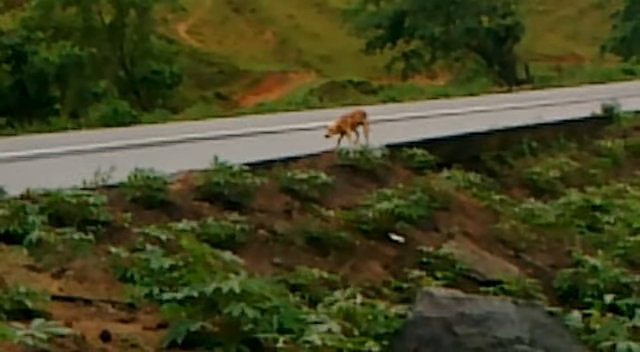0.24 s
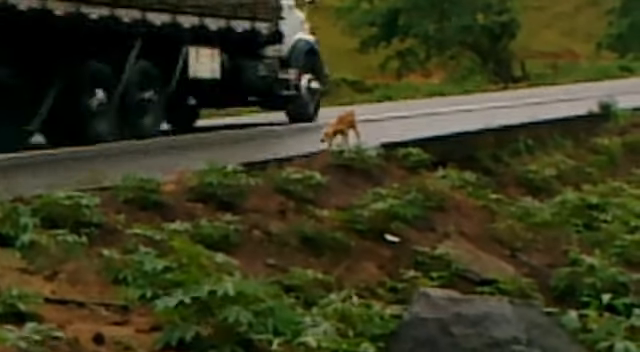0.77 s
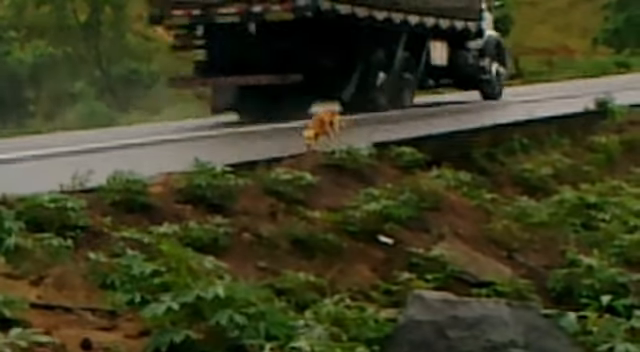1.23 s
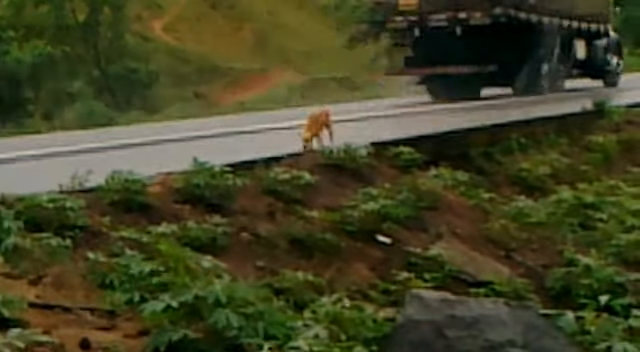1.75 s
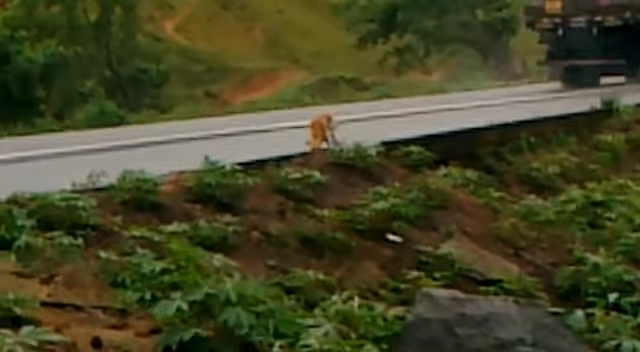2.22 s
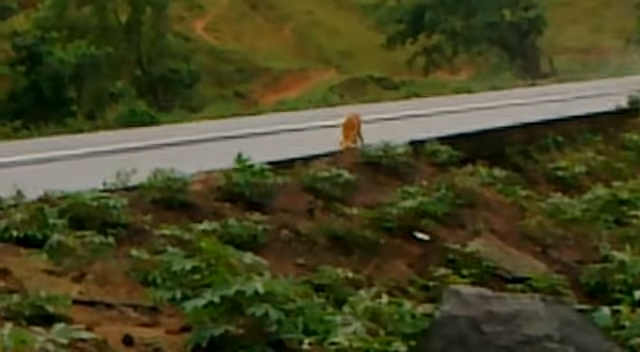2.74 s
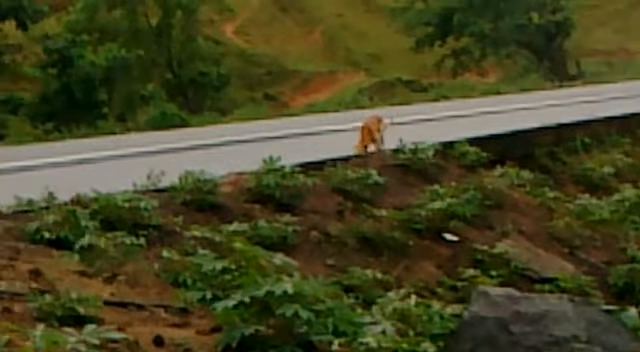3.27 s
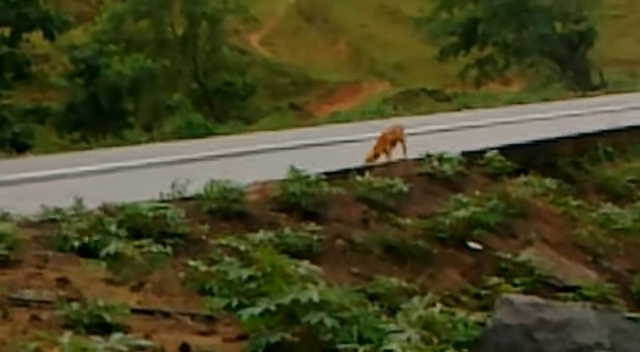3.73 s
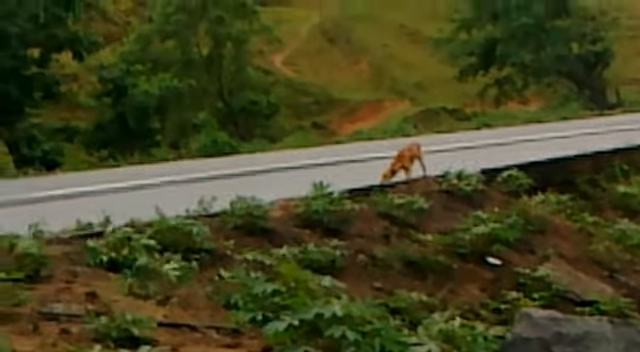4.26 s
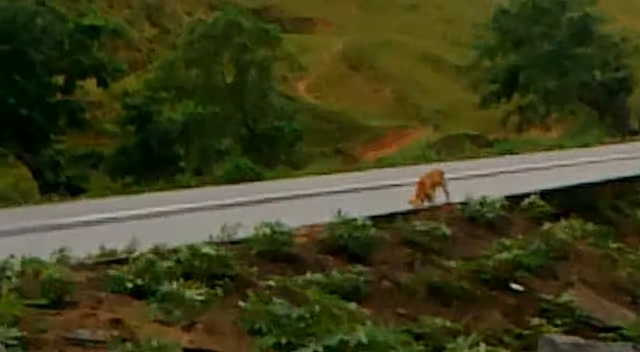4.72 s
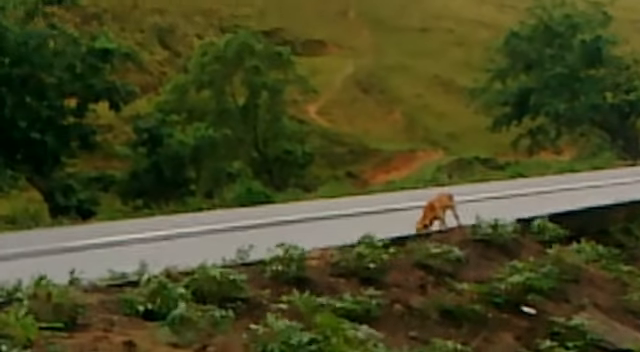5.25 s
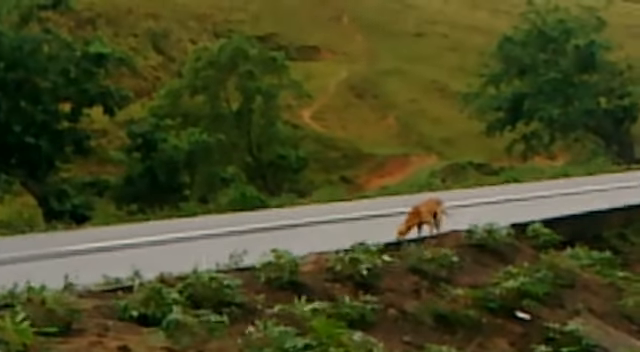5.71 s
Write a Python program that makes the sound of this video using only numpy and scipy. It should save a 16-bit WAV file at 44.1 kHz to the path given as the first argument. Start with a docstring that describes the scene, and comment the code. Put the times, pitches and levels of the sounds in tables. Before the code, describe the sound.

Outdoors beside a wet highway, a heavy diesel truck is already loud at the start and passes within the first half second. Its buzzing low exhaust drone drops slightly in pitch while tyre roar and spray hiss fall away. The rest is a fading, duller drone with soft low air gusts and a few faint rustles. One fixed roadside microphone, mono, no echo.

```python
"""On the verge of a wet highway, a heavy diesel truck passes and pulls away from the listener.
Exhaust: partials of the firing rate, sinking in pitch by the Doppler effect, and gas noise puffing at each firing.
Tyres and spray: noise bands whose colour changes as the truck recedes, with finer mist and brief swells above.
Moving air: low noise in gusts; with distance the sound dulls and a low rumble stays around the drone."""
import sys
import numpy as np
from scipy import signal
from scipy.fft import rfft, irfft, next_fast_len
from scipy.io import wavfile

SR = 44100
rng = np.random.default_rng(int(sys.argv[2]) if len(sys.argv) > 2 else 0)


def file_out(sig):
    """Save sig as 16-bit WAV at sys.argv[1]."""
    # one column per channel
    cols = np.atleast_2d(sig).T
    # limit, then scale
    lim = np.clip(cols, -1, 1)
    pcm = np.round(lim * 32767).astype(np.int16)
    wavfile.write(sys.argv[1], SR, pcm)


N = 264159

SPEED_M_PER_S, ROAD_DISTANCE_M = 17.74, 11.6
# gusts of moving air: time_s, half_length_s, rumble_rise_db, churn_rise_db
GUSTS = [(.03, 0.056, 2, 4), (1.45, .15, 1, 0.5), (2.082, 0.26, 4.5, 2.5), (2.7, 0.14, 4, 7),
         (3.08, 0.14, 7, 4), (4.14, 0.23, 6, 5.5), (5.03, 0.15, 6, 8.5), (5.46, 0.094, 5, 13.5)]


def from_db(db):
    """Level to amplitude: 20 dB is a factor of ten."""
    return 10 ** (np.asarray(db) / 20)


def rms_one(x):
    """Normalization by the root mean square, to an rms of 1."""
    return x / np.sqrt(np.mean(x ** 2) + 1e-20)


def in_time(rows):
    """Linear interpolation: each table column after the first, time_s, becomes a curve over all samples."""
    time_s, *columns = np.transpose(rows)
    return [np.interp(np.arange(N) / SR, time_s, column) for column in columns]


def bell(centre_s, half_length_s):
    """Gaussian envelope of height 1; the half length is its standard deviation."""
    return np.exp(-((np.arange(N) / SR - centre_s) / half_length_s) ** 2 / 2)


def rises(events):
    """Superposed Gaussian envelopes: one smooth level curve for each dB column of the events."""
    return sum(np.outer(dbs, bell(time_s, half_s)) for time_s, half_s, *dbs in events)


def shaped_noise(gain_at):
    """Spectral shaping: white noise filtered by a gain that depends on frequency, at an rms of 1."""
    size = next_fast_len(N)
    hz = np.maximum(np.arange(size // 2 + 1) * SR / size, 1e-3)
    spectrum = rfft(rng.standard_normal(size)) * gain_at(hz)
    return rms_one(irfft(spectrum, size)[:N])


def drift(rate_hz):
    """Low-pass noise as a slow random wander of rms 1; the gain is halved at the given rate."""
    return shaped_noise(lambda hz: 1 / (1 + (hz / rate_hz) ** 2))


def coloured(spectrum):
    """Noise of rms 1 with a spectrum drawn over log frequency, falling steeply beyond its ends."""
    points_hz, level_db = np.transpose(spectrum)

    def gain_at(hz):
        skirts = np.minimum(1, np.minimum(hz / points_hz[0], points_hz[-1] / hz)) ** 12
        return skirts * from_db(np.interp(np.log(hz), np.log(points_hz), level_db))

    return shaped_noise(gain_at)


def receding(spectra, away):
    """Equal-power crossfade between independent noises, as the truck turns its back and draws away."""
    away = np.clip(away, 0, len(spectra) - 1)
    blend = 0
    for stage, spectrum in enumerate(spectra):
        share = np.maximum(0, 1 - abs(away - stage))
        blend = blend + np.sqrt(share) * coloured(spectrum)
    return blend


def puffs(crank, away, depth, lead, blur):
    """Amplitude modulation at the firing rate, which scattered sound evens out with distance."""
    swing = depth * np.exp(-blur * away)
    return np.exp(swing * np.cos(crank - lead) - swing ** 2 / 2)


def passing(nearest_s, near_db, doubling_db, far_db):
    """Distance law: direct sound loses doubling_db per doubling, in power sum with steady scattered sound."""
    along_m = SPEED_M_PER_S * (np.arange(N) / SR - nearest_s)
    doublings = np.log2(np.hypot(along_m, ROAD_DISTANCE_M) / ROAD_DISTANCE_M)
    direct_db = near_db - doubling_db * doublings
    return 20 * np.log10(np.hypot(from_db(direct_db), from_db(far_db)))


def rumble(gust_db):
    """Low-frequency noise around the drone carries far, so its level falls little with distance."""
    # hz, relative_level_db
    rumble_colour = [(12, -21), (35, -13.5), (55, -5.5), (75, -11.5), (105, 5), (120, -1.5), (135, -3.5),
                     (160, -7), (190, -8), (215, -20.5), (236, -10), (260, -29), (320, -30)]
    level_db = passing(nearest_s=0.33, near_db=-38.5, doubling_db=0.74, far_db=-51) + gust_db
    return from_db(level_db) * coloured(rumble_colour)


def churn(gust_db):
    """Turbulence noise of the air churned up around the chassis soon dies away with distance."""
    # hz, relative_level_db
    churn_colour = [(20, -5), (60, 0), (150, 5.5), (240, 5), (320, 4), (410, -3.5), (490, -2.5), (600, -7)]
    level_db = passing(nearest_s=-0.49, near_db=-24, doubling_db=10, far_db=-62) + gust_db
    return from_db(level_db) * coloured(churn_colour)


def swells():
    """Band-limited noise under Gaussian envelopes: tyres singing on the wet road, then soft rustles."""
    # time_s, half_length_s, centre_hz, half_width_hz, peak_level_db; the first row is the singing
    swell_rows = [(1.35, .6, 4230, 70, -55), (4.15, 0.043, 10500, 2600, -63), (4.82, 0.13, 3930, 300, -51),
                  (5.34, 0.024, 7500, 550, -55.5)]
    total = 0
    for time_s, half_s, centre_hz, width_hz, db in swell_rows:
        band = shaped_noise(lambda hz: np.exp(-((hz - centre_hz) / width_hz) ** 2 / 2))
        total = total + from_db(db) * bell(time_s, half_s) * band
    return total


def mist():
    """High-frequency noise of the finest droplets off the treads, under a level envelope."""
    # time_s, level_db
    mist_level = [(0, -50), (.18, -48), (.26, -53), (.54, -54.5), (.72, -64), (1.25, -55.5), (3.2, -65),
                  (5.99, -69)]
    # hz, relative_level_db
    mist_colour = [(10500, -1.5), (12500, -0.5), (14500, -5), (15700, -8)]
    level_db, = in_time(mist_level)
    return from_db(level_db) * coloured(mist_colour)


def ground_dip(x, width_hz):
    """Destructive interference: the road's reflection cancels a band that rises as the wheels go by."""
    # time_s, centre_hz, depth (0-1)
    dip_path = [(0, 5300, 0.35), (.2, 5870, 0), (.35, 7350, 0.7), (.55, 7500, 0.4), (.8, 8100, 0.18)]
    hz, depth = in_time(dip_path)
    # shift the band down to zero, isolate it, shift it back and subtract
    turn = np.exp(2j * np.pi * np.cumsum(hz) / SR)
    lowpass = signal.butter(1, width_hz, fs=SR, output="sos")
    band = signal.sosfilt(lowpass, x / turn) * turn
    return x - 2 * np.clip(depth, 0, 1) * band.real


def spray(away, surge_db):
    """Broadband droplet hiss, comb-like in one band where the road's reflection cancels it."""
    # one spectrum each for alongside, just past, far off: hz, relative_level_db
    spray_colours = [
        [(2060, -28), (3500, -1), (4150, 3.5), (5610, -10.5), (6840, -4.5), (7910, -7.5), (9510, -18),
         (10800, -33), (14000, -51), (22000, -120)],
        [(2060, -36), (3500, -5), (3790, -7.5), (4250, 2), (4710, -3), (5100, -1.5), (5480, -3), (5910, -2),
         (6650, -3), (7230, -9.5), (7950, -10), (8990, -7.5), (10800, -15.5), (14000, -49), (22000, -120)],
        [(2060, -19), (3500, -9.5), (4190, 1.5), (4410, -5), (5200, -1.5), (5560, -4), (5960, 0.5), (6520, 0),
         (7480, -7), (8140, -15.5), (10800, -27), (14000, -47), (22000, -120)],
    ]
    level_db = passing(nearest_s=0.37, near_db=-34.7, doubling_db=5.0, far_db=-56.5) + surge_db
    return from_db(level_db) * ground_dip(receding(spray_colours, away), width_hz=520)


def tyre_roar(crank, away, surge_db):
    """Rolling noise: a broad band, gently amplitude-modulated at the firing rate."""
    # one spectrum each for alongside, just past, far off: hz, relative_level_db
    tyre_colours = [
        [(590, -31), (1000, -4), (1130, -3), (1380, -4), (1560, 1), (1750, -2.5), (1900, 0.5), (2200, 0),
         (2350, -1.5), (2850, -8.5), (3700, -19), (4810, -39), (8140, -120)],
        [(590, -43), (1000, -3), (1090, -5.5), (1210, 0), (1380, 1), (1870, 0.5), (2080, -4), (2350, -0.5),
         (2580, -2), (2830, -10.5), (3300, -6), (3700, -21), (4810, -31), (8140, -120)],
        [(590, -32), (1000, -4), (1120, -4), (1200, -0.5), (1320, 2.5), (1590, -5), (1830, 1.5), (2160, -3.5),
         (2520, 1.5), (2800, -8.5), (3040, -3.5), (3460, -10), (3700, -29), (4810, -42), (8140, -120)],
    ]
    # time_s, level_db
    tyre_level = [(0, -24.5), (.27, -28.5), (.52, -29.5), (.78, -33), (1.05, -35.5), (2.3, -37.5),
                  (3.8, -44), (5.99, -43.5)]
    level_db = in_time(tyre_level)[0] + surge_db + 0.32 * drift(12)
    pulsing = puffs(crank, away, depth=0.16, lead=-0.38, blur=0.6)
    return from_db(level_db) * receding(tyre_colours, away) * pulsing


def exhaust_rasp(crank, away, surge_db):
    """Modulated noise: close by, gas noise and the engine's clatter come in puffs at the firing rate."""
    # one spectrum each for alongside, just past, far off: hz, relative_level_db
    rasp_colours = [
        [(260, -17), (450, -5), (519, -4.5), (555, -10), (642, -4), (792, -6), (1100, -4.5), (1430, -35),
         (2420, -120)],
        [(260, -65), (450, -21), (555, 2), (831, 0), (969, -3.5), (1100, -20), (1430, -43), (2420, -120)],
        [(260, -17), (450, -8.5), (472, -8.5), (507, -1), (523, 1), (625, 0.5), (652, 4), (708, 1), (819, 2),
         (1100, -11), (1430, -47), (2420, -120)],
    ]
    level_db = passing(nearest_s=0.11, near_db=-29, doubling_db=9.5, far_db=-39.6) + surge_db
    level_db = level_db + 0.98 * drift(11.5)
    pulsing = puffs(crank, away, depth=0.26, lead=-0.96, blur=0.73)
    return from_db(level_db) * receding(rasp_colours, away) * pulsing


def fading(order):
    """Level modulation: the separate fades and swells of one low exhaust partial, in dB."""
    # multiple_of_firing_rate, time_s, half_length_s, change_db
    fades = [(1, 1.3, 0.091, -2), (1, 1.71, .07, -2), (1, 1.98, .03, -8), (1, 2.1, 0.026, 5),
             (1, 3.1, 0.091, 4), (1, 3.66, 0.23, 1.2), (2, .65, 0.075, -7.5), (2, 1.28, 0.045, -3),
             (2, 1.7, .1, 3), (2, 2.02, 0.091, -4), (2, 2.59, 0.41, -10), (2, 3.9, 0.053, -7),
             (2, 4.6, .08, 6), (2, 5.4, 0.11, 3.5), (3, 0.2, 0.046, 3.5), (3, .62, 0.069, -9.5),
             (3, 1.41, 0.097, -13.5), (3, 2.12, 0.18, 1.5), (3, 3.21, 0.26, -10.5), (3, 4.05, 0.25, -6),
             (3, 5.08, .05, -10)]
    return sum(db * bell(time_s, half_s) for k, time_s, half_s, db in fades if round(k) == order)


def exhaust_drone(crank, away, waver, rough, shimmer):
    """Fourier synthesis: the whole-number partials line up in one sharp dip of pressure a firing cycle."""
    # weaker partials, the fractional ones from unequal cylinders: multiple_of_firing_rate, relative_level_db
    overtones = [(2 / 3, -25.5), (4 / 3, -31), (3 / 2, -43), (5 / 2, -28), (8 / 3, -27), (7 / 2, -26),
                 (4, -26), (6, -27.5), (7.7, -29), (7.4, -36)]
    first_db = passing(nearest_s=0.21, near_db=-16.5, doubling_db=15, far_db=-25.0) + fading(order=1)
    second_db = passing(nearest_s=0.043, near_db=-23, doubling_db=7.5, far_db=-51) + fading(order=2)
    third_db = passing(nearest_s=0.19, near_db=-27.0, doubling_db=10.5, far_db=-45.5) + fading(order=3)
    first = from_db(first_db) * np.cos(crank) * (1 + waver * away * drift(13))
    # scattered sound blurs the second partial, more so with distance
    scatter = rough * away
    second_phase = 2 * crank + scatter * drift(14.0)
    second = from_db(second_db) * np.cos(second_phase) * (1 + scatter / 2 * drift(5.5))
    third = from_db(third_db) * np.cos(3 * crank)
    high = 0
    for k, db in overtones:
        in_phase = np.cos(k * crank) * (1 + shimmer * drift(4.9))
        quadrature = shimmer * drift(1.9) * np.sin(k * crank)
        high = high + from_db(db) * (in_phase + quadrature)
    # the higher partials weaken faster with distance than the first
    high_db = first_db + 2.0 - 6.45 * away
    return -np.sqrt(2) * (first + second + third + from_db(high_db) * high)


def scene():
    """Superposition of moving air, wet-road noise and exhaust."""
    # firing rate as heard, falling by the Doppler effect: time_s, firing_hz
    firing_rate = [(0, 97.6), (.18, 95.5), (.33, 93.9), (.62, 91.8), (1.05, 90.4), (1.8, 89.6), (3, 89.0),
                   (4.3, 88.65), (5.99, 88.1)]
    # how far the truck has drawn away: time_s, stage (0 alongside, 1 just past, 2 far off)
    departure = [(0, 0.41), (.25, 0.077), (.7, 0.89), (1.3, 1.21), (2.2, 1.46), (3.2, 1.69), (4.2, 1.87),
                 (5.99, 1.99)]
    # surges and ebbs of the broad sounds: time_s, half_length_s, rasp_db, tyre_db, spray_db
    surges = [(.28, .06, 1.5, -1, -2.3), (1.05, 0.15, 2.4, -0.5, 0), (3.45, 0.28, -2.5, 0, -1.8),
              (4.48, 0.077, -2.5, 1.5, 1.3), (4.782, 0.1, -.5, 2, 2.5), (5.03, .06, 0, -1, -2.2),
              (5.333, 0.047, .5, 1.2, 3.7), (5.6, .05, .5, 1.2, 2.3)]
    firing_hz, = in_time(firing_rate)
    away, = in_time(departure)
    crank = 2 * np.pi * np.cumsum(firing_hz) / SR + np.pi / 2   # firing phase, radians
    rumble_gust_db, churn_gust_db = rises(GUSTS)
    rasp_surge_db, tyre_surge_db, spray_surge_db = rises(surges)
    air = rumble(rumble_gust_db) + churn(churn_gust_db)
    # spray and mist come off the treads in uneven flurries
    flurry = from_db(0.81 * drift(23))
    wet = flurry * (spray(away, spray_surge_db) + mist())
    tyres = tyre_roar(crank, away, tyre_surge_db)
    rasp = exhaust_rasp(crank, away, rasp_surge_db)
    drone = exhaust_drone(crank, away, waver=0.074, rough=0.24, shimmer=0.41)
    return (air + swells() + wet + tyres + rasp + drone)[None]


def record(dry):
    """Band limiting: an elliptic low-pass cuts the top steeply, after 3 ms ramps that prevent clicks."""
    from_edge = np.minimum(np.arange(N), np.arange(N)[::-1])
    edges = np.minimum(from_edge / (0.003 * SR), 1)
    # order 12, 0.1 dB ripple, 90 dB rejection, cutoff 15700 Hz
    lowpass = signal.ellip(12, 0.1, 90, 15700, fs=SR, output="sos")
    return signal.sosfilt(lowpass, dry * edges)


dry = scene()
out = record(dry)
file_out(out)
```